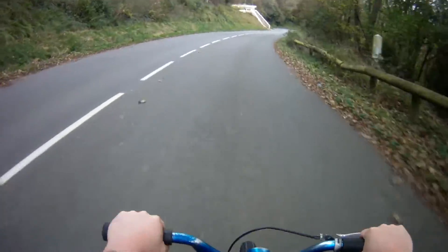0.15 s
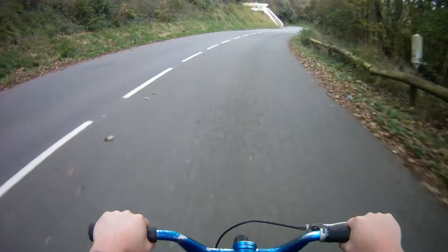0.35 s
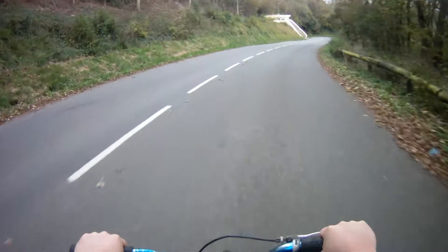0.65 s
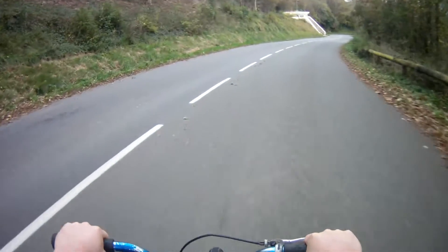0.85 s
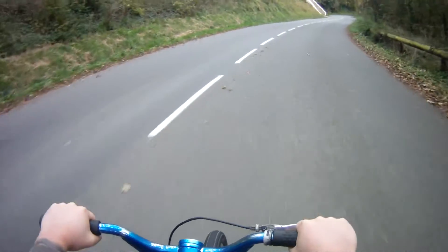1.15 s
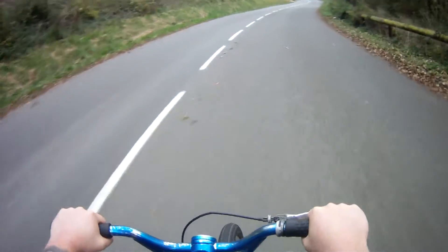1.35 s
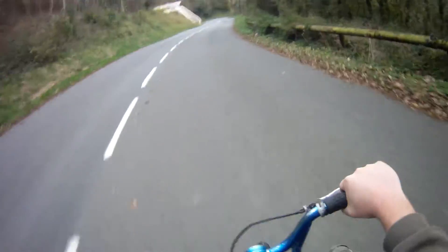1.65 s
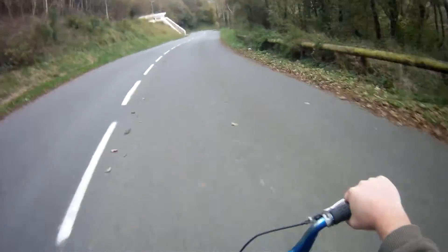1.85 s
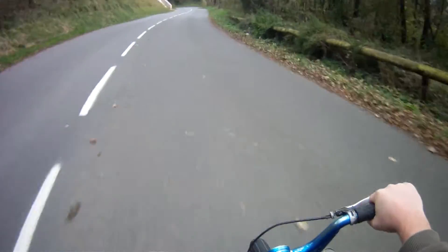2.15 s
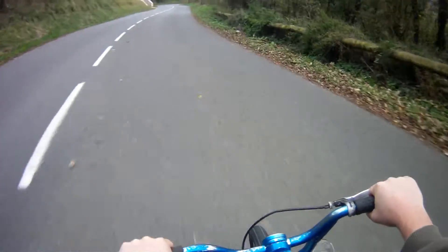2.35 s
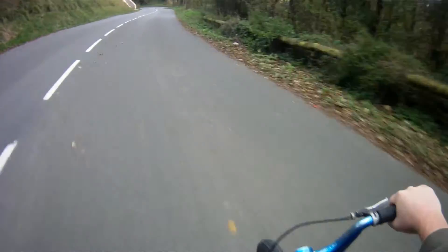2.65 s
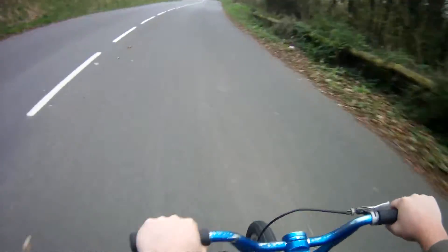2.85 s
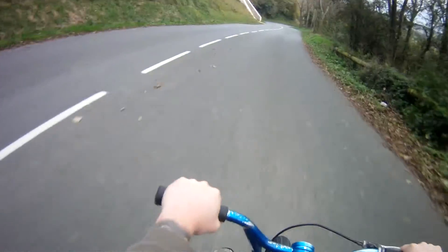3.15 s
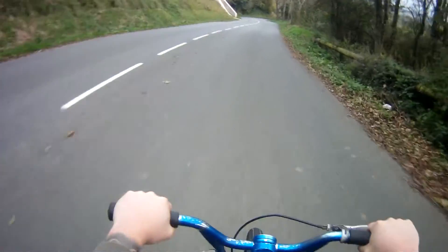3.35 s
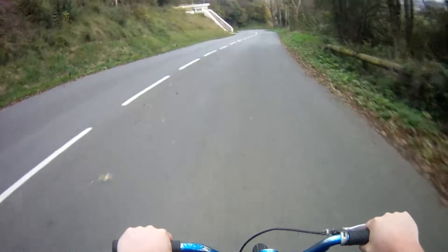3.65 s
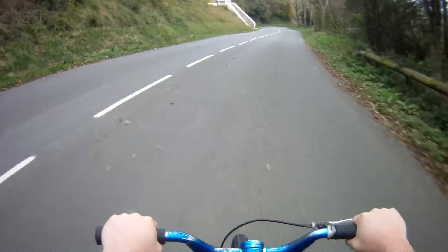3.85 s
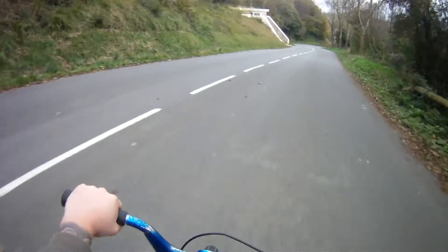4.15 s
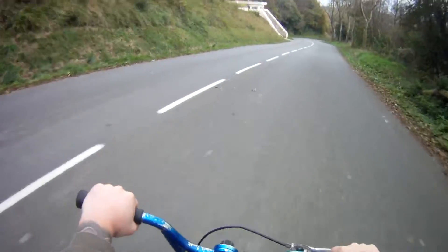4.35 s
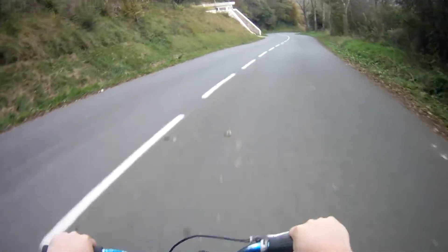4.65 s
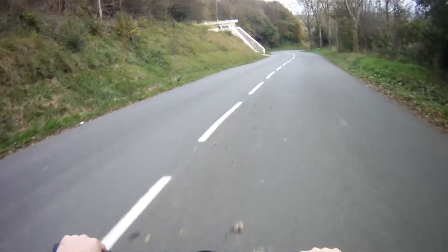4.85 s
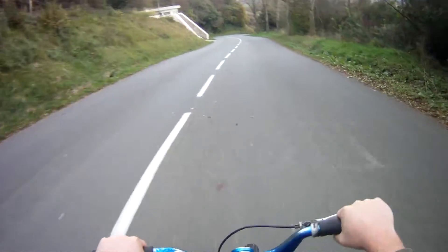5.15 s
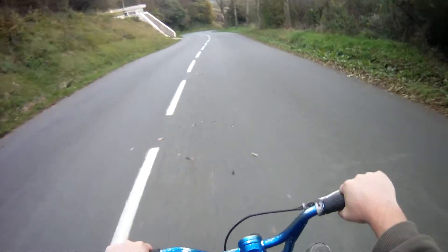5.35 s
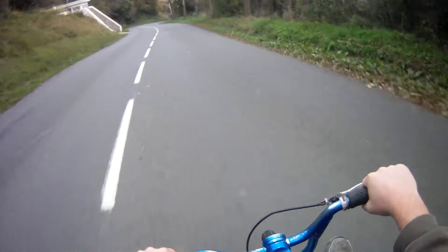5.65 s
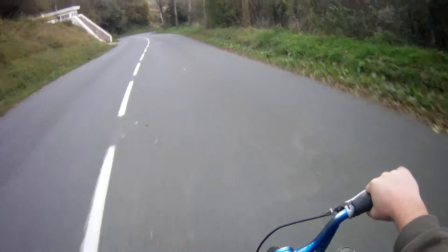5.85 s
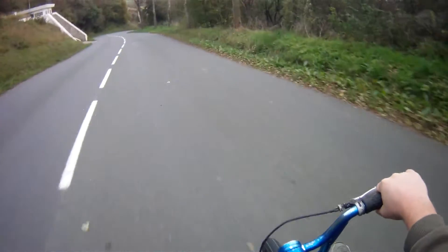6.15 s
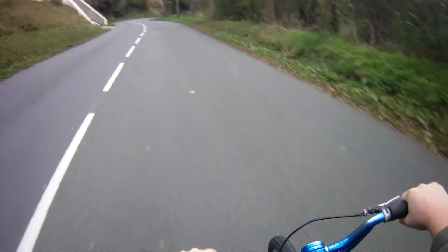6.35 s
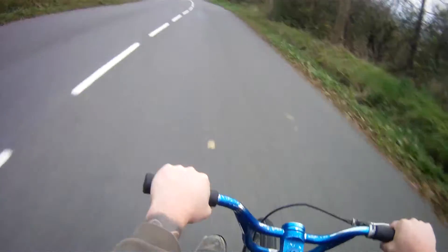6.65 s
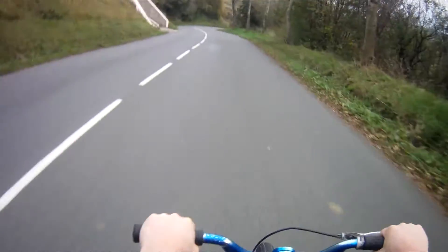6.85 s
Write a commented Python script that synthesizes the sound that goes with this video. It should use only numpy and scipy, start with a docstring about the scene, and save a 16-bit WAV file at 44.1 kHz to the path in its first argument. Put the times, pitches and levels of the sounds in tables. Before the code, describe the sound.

Hard plastic wheels of a drift trike roll fast over asphalt throughout: a dense, grainy, uneven roar with coarse stone ticks, coloured boxy and nasal by the camera's plastic case. Underneath are a soft low drone, faint lumpy wind rumble and steady hiss. At 0-0.7 s come thin squeaks and arching whistles near 3 kHz, with a knock and tiny metallic clinks. Around 1 s there are knocks and a hollow seat clonk. From 1.4 to 2.8 s the wheels scrape sideways in rough chatter, with hard knocks near 2.3 and 2.6 s and squeals towards 2.9. From 3 to 3.4 s knocks and clacks crowd together; another rattling burst with clonks fills 4-4.6 s. High clinks lead into gliding squeals at 4.8-5.6 s over renewed skidding, lasting until about 6.4 s. Scattered clacks and jingle follow, a clonk at 6.5 s and a sharp knock at 6.85 s, still rolling at the end.

```python
"""The hard rear wheels of a drift trike rumble over asphalt: dense random grains and coarser ticks.
Sideways slides add chattering noise and wandering wheel notes; gliding sines make squeals and whistles.
Jolts set off knocks, clacks, jingle and ringing frame notes; a seat clonks and a loose part clinks.
A body camera in a plastic case hears it all: case resonances colour the impacts and scrapes,
over a droning mount with soft bumps, a faint lumpy wind rumble and steady hiss."""
import sys
import numpy as np
from scipy import signal
from scipy.fft import rfft, irfft, next_fast_len
from scipy.io import wavfile
from scipy.ndimage import uniform_filter1d, map_coordinates

SR = 44100
rng = np.random.default_rng(int(sys.argv[2]) if len(sys.argv) > 2 else 0)


def log_audio(samples):
    """Write samples as a 16-bit WAV file to the path given in sys.argv[1]."""
    # one column per channel
    frames = np.atleast_2d(samples).T
    # limit to full scale, then quantise
    limited = np.clip(frames, -1, 1)
    pcm = np.round(limited * 32767).astype(np.int16)
    wavfile.write(sys.argv[1], SR, pcm)


N = 309141

# drive of the wheels by the road: (time [s], fine-texture roar level [dB], stone level [dB])
ROAD_LEVELS = [(0, -61, -54.5), (0.7, -60.5, -54.5), (1.65, -54, -54.5), (1.85, -56.5, -48),
               (2.35, -57, -50), (2.9, -57, -54.5), (3.2, -58.5, -50.5), (3.58, -58.5, -49.5),
               (3.95, -56, -61), (4.15, -55, -52.5), (4.45, -58, -50.5), (5.15, -54.5, -52.5),
               (5.8, -60, -49.5), (6.25, -55, -51.5), (6.45, -57, -54.5), (7.01, -57.5, -54)]
# treble colour of shaken small metal parts: (frequency [Hz], relative level [dB])
JINGLE_TINT = [(3000, -37), (6000, -5.5), (8400, -0.5), (9500, 4.5), (10400, 10), (11500, 7), (12600, -5),
               (15000, -9)]


def amp(db):
    """Decibels to gain."""
    return 10 ** (np.asarray(db) / 20)


def unit(x):
    """Scale x to rms 1."""
    return x / np.sqrt(np.mean(x ** 2) + 1e-20)


def curves(rows):
    """Interpolate each column after the time to one value per sample."""
    times, *columns = np.transpose(rows)
    return [np.interp(np.arange(N) / SR, times, column) for column in columns]


def wobble(rate):
    """A smooth random curve of rms 1 with `rate` knots a second."""
    knots = rng.standard_normal(int(N * rate / SR) + 4)
    return unit(map_coordinates(knots, [np.arange(N) * rate / SR]))


def gate(start, length, attack, release):
    """An envelope that rises around the start, holds and dies away."""
    t = np.arange(N) / SR - start
    rise = np.clip(t / attack + .5, 0, 1)
    return rise * np.exp(-np.maximum(t - length, 0) / release)


def swell(t, attack, decay):
    """A rounded rise to the peak at t = 0, then a slower exponential fall."""
    return np.exp(np.where(t < 0, -(t / attack) ** 2, -np.abs(t) / decay))


def grains(rate, spread_db):
    """Tiny impacts at random moments, of uneven size and random sign, rms 1."""
    struck = rng.random(N) < rate / SR
    size = amp(spread_db * np.clip(rng.standard_normal(N), -2, 2))
    return unit(struck * size * np.sign(rng.standard_normal(N)))


def grid(size=8192):
    """The frequencies on which responses are drawn, shifted by 1 Hz to avoid zero."""
    return np.fft.rfftfreq(size, 1 / SR) + 1


def colour(points):
    """Gain through (Hz, dB) points on a log frequency axis."""
    hz, db = np.transpose(points)
    return amp(np.interp(np.log(grid()), np.log(hz), db))


def resonances(modes):
    """Gain of steep-sided resonances whose powers add."""
    f = grid()
    power = 0
    for hz, width, db in modes:
        detuning = (f * f - hz * hz) / (f * width)
        power = power + amp(db) ** 2 / (1 + detuning ** 2) ** 2
    return np.sqrt(power)


def ring(x, gain):
    """Filter x causally (minimum phase) by that gain shape, keeping the power of white noise."""
    cepstrum = irfft(np.log(np.maximum(gain / gain.max(), 1e-6)))
    half = len(cepstrum) // 2
    cepstrum[1:half] *= 2  # fold the cepstrum onto positive time
    cepstrum[half + 1:] = 0
    response = irfft(np.exp(rfft(cepstrum)))[:half]
    return signal.fftconvolve(x, response / np.linalg.norm(response))[:N]


def through_case(force, points):
    """A force of the given colour rings the plastic camera case."""
    # resonances of the case and its mount: (frequency [Hz], width [Hz], relative level [dB])
    case_modes = [(646, 350, -18.5), (953, 258, -10), (1110, 113, -7), (1231, 156, -4.5), (1463, 164, -4),
                  (1634, 60, -9), (2102, 283, 0.5), (2257, 178, -0.94), (2880, 310, -8), (3370, 510, -7),
                  (3733, 270, -8.5), (3800, 270, -22.5), (4440, 680, -9.5), (4963, 155, -7.5),
                  (5304, 370, -12.5), (5910, 310, -18.5), (6234, 226, -13), (6680, 530, -21.5),
                  (6850, 220, -15), (7250, 920, -19), (8455, 280, -18.5), (9530, 500, -16),
                  (10600, 110, -21.5), (11000, 1500, -28.5), (12500, 1439, -27), (14700, 2300, -23.5)]
    return ring(force, colour(points) * resonances(case_modes))


def patchy(x, depth_db):
    """Make the colour of x wander in patches a few hundred hertz wide."""
    spectrum = signal.stft(x, nperseg=512)[2]
    field = rng.standard_normal(spectrum.shape)
    for _ in range(2):
        field = uniform_filter1d(field, size=3, axis=0)  # across frequency
        field = uniform_filter1d(field, size=16, axis=1)  # across time
    return signal.istft(spectrum * amp(depth_db * unit(field)), nperseg=512)[1][:N]


def rolling():
    """Fine asphalt texture makes a dense, shifting roar; coarser stones tick in clumps on the wheels."""
    # colours of the two forces: (frequency [Hz], relative level [dB])
    roar_tint = [(400, -1), (1000, -1), (1500, 0), (2150, -2), (2900, 4.5), (3600, -1.5), (5200, -3.5),
                 (6500, -11), (9500, -23.5), (15000, -10.5)]
    stone_tint = [(500, -8), (1300, -4), (2150, -2), (2900, -6), (5000, -6), (9500, -13.5), (15000, -21.5)]
    roar_db, stones_db = curves(ROAD_LEVELS)
    texture_db = 0.55 * wobble(14) + 1.0 * wobble(70)
    roar_force = grains(rate=7000, spread_db=3.5) * amp(roar_db + texture_db + 3.5)
    roar = through_case(roar_force, roar_tint)
    clumps_db = 2.12 * wobble(150)
    stone_force = grains(rate=650, spread_db=1.5) * amp(stones_db + clumps_db - 1.1)
    stones = through_case(stone_force, stone_tint)
    return patchy(roar, depth_db=1.5) + stones


def sliding():
    """Plastic scrapes sideways in a fast uneven chatter that stirs notes of the wheels."""
    # sideways slides of the rear wheels: (start [s], hold [s], drive level [dB])
    slide_rows = [(0.0, 0.13, -68), (1.288, 0.044, -59.5), (1.43, 0.56, -61.5), (2.053, 0.72, -59.5),
                  (2.896, 0.11, -61.5), (3.215, 0.1, -66), (3.531, 0.16, -61.5), (4.024, 0.24, -63.5),
                  (4.504, 0.037, -59), (5.064, 0.53, -59.5), (5.677, 0.68, -59), (6.438, 0.11, -55),
                  (6.662, 0.046, -59)]
    # scrape colour: (frequency [Hz], relative level [dB])
    scrape_tint = [(500, -13), (1200, -10), (2150, -7), (3300, -9.5), (4400, -2.5), (6500, -0.5),
                   (9500, -2.5), (10400, 0), (11200, 3.5), (12600, 1), (14000, -10), (15300, -9)]
    # wheel notes: (frequency [Hz], nominal width [Hz], relative level [dB])
    wheel_notes = [(1530, 55, -13.5), (3350, 70, 1), (4500, 110, -7.5), (4860, 80, 3), (6040, 110, -14.5),
                   (6250, 80, -5), (6600, 38, -9.5), (7290, 90, -3.5), (9740, 88, -5), (10330, 150, -1),
                   (12500, 330, -15)]
    attack_s, release_s = 0.038, 0.083  # the wheels break loose, and grip again
    creep_db = -13  # slight scrape of gripping wheels, relative to the roar drive
    t = np.arange(N) / SR
    roar_db, _ = curves(ROAD_LEVELS)
    slides = [amp(db) * gate(start, hold, attack_s, release_s) for start, hold, db in slide_rows]
    level = np.max(slides + [amp(roar_db + creep_db)], axis=0)
    chatter_db = 1.58 * wobble(35) + 2.15 * wobble(150)
    force = level * amp(chatter_db)
    scrape = through_case(force * grains(rate=5000, spread_db=2.5) * amp(4.5), scrape_tint)
    sing = np.zeros(N)
    for hz, width, db in wheel_notes:
        # a random complex envelope spreads each note into a narrow band
        envelope = wobble(1.3 * width) + 1j * wobble(1.2 * width)
        note = np.real(envelope * np.exp(2j * np.pi * hz * t))
        sing += note * amp(db + 3.8 * wobble(10) - 10.0)
    return patchy(scrape, depth_db=1.85) + force * sing


def mount():
    """The road keeps the camera mount droning softly; bumps push it into brief damped swings."""
    # mount resonances: (frequency [Hz], width [Hz], relative level [dB])
    mount_modes = [(122, 20.6, -8), (168, 29, -3.5), (205.6, 36, 1), (265.4, 60, -1.5), (449, 163, -6)]
    # soft bumps: (start [s], drive level [dB], pitch [Hz], decay [s])
    bump_rows = [(0.159, -49.5, 205, 0.0075), (0.183, -57, 150, 0.008), (1.987, -50, 205, 0.0047),
                 (2.811, -56, 150, 0.0046), (2.823, -47, 218, 0.0057), (2.863, -56, 190, 0.008),
                 (4.449, -54, 205, 0.0065), (5.031, -57, 150, 0.012), (5.131, -61, 208, 0.015),
                 (5.534, -58, 195, 0.018), (6.307, -51.5, 205, 0.0048)]
    roar_db, _ = curves(ROAD_LEVELS)
    drone_db = -71.5 + 0.47 * (roar_db - roar_db.mean()) + 1.14 * wobble(20)
    drone = rng.standard_normal(N) * amp(drone_db)
    t, bumps = np.arange(SR // 8) / SR, np.zeros(N)
    for start, db, hz, decay in bump_rows:
        swing = np.sin(2 * np.pi * hz * t) * np.exp(-t / decay) * (1 - np.exp(-t / 0.0016))
        push = t / .003 * np.exp(-t / .003)
        bumps[int(start * SR):][:len(t)] += amp(db + 3.0) * (swing - .4 * push)
    return ring(drone, resonances(mount_modes)) + bumps


def wind():
    """The airstream is filtered noise: a faint, lumpy rumble inside the shut case."""
    # rumble colour: (frequency [Hz], relative density [dB per Hz])
    rumble_tint = [(8, -11), (24, 6.5), (35, 1), (50, -10.5), (75, -18.5), (150, -29), (500, -36),
                   (2000, -87)]
    wind_db, gust_db = -74.5, 2  # middle level and rms of its slow swing
    rumble = ring(rng.standard_normal(N), colour(rumble_tint))
    return rumble * amp(wind_db + gust_db * wobble(3) + 2.0 * wobble(12))


def hiss():
    """A steady bed of coloured noise."""
    # hiss colour: (frequency [Hz], relative density [dB per Hz])
    hiss_tint = [(30, 0), (600, -1), (3000, -6.5), (8000, -12), (15000, -18.5)]
    return ring(rng.standard_normal(N), colour(hiss_tint)) * amp(-68.0)


def fine_hiss():
    """Independent treble noise for each of the two channels."""
    # treble colour: (frequency [Hz], relative level [dB])
    treble_tint = [(3000, -39), (6000, -19), (9000, -1), (12000, -3), (14000, -0.5)]
    channels = [ring(rng.standard_normal(N), colour(treble_tint)) for _ in range(2)]
    return amp(-78.5) * np.array(channels)


def light_jolts():
    """Small road flaws shake the frame at random, harder when the roar is louder; rows as in rattles."""
    # drive relative to the roar drive: (knock [dB], clack [dB], jingle [dB])
    jolt_offsets = [5.6, -6, -9.5]
    jolts_per_s, length_s, spread_db = 10, 0.0052, 2.5
    note_hz, note_scatter = 4980, 0.026  # typical frame note and its relative scatter
    roar_db, _ = curves(ROAD_LEVELS)
    moments = np.flatnonzero(rng.random(N) < jolts_per_s / SR)
    scatter_db = spread_db * np.clip(rng.standard_normal((N, 3)), -1.5, 1.5)
    hz = note_hz * (1 + note_scatter * rng.standard_normal(N))
    rows = []
    for i in moments:
        levels = roar_db[i] + scatter_db[i] + np.asarray(jolt_offsets)
        rows.append((i / SR, length_s, *levels, hz[i]))
    return rows


def rattles():
    """Each jolt knocks the case and shakes loose parts into a short flurry of clacks and jingle."""
    # strong jolts: (time [s], nominal length [s], knock drive [dB], clack drive [dB],
    # jingle drive [dB], loudest frame note [Hz])
    strong_jolts = [(0.025, 0.0068, -45, -62, -64, 4970), (0.187, 0.011, -44.5, -52, -60, 4930),
                    (0.997, 0.015, -52, -54.5, -59, 4550), (1.053, 0.004, -44, -60, -71, 4940),
                    (1.371, 0.0048, -50, -53, -70, 4940), (1.445, 0.026, -49, -52, -64, 5170),
                    (1.491, 0.04, -71, -63, -57, 4940), (2.251, 0.004, -39, -48.5, -65, 4420),
                    (2.338, 0.007, -42, -57, -56, 4940), (2.383, 0.011, -40, -58, -56, 4940),
                    (2.592, 0.006, -39, -53, -56, 4940), (2.638, 0.009, -40, -51.5, -63, 4940),
                    (2.957, 0.006, -52, -48, -62, 4940), (2.996, 0.011, -60, -50, -60, 4950),
                    (3.098, 0.008, -43, -49, -62, 4940), (3.132, 0.0069, -39, -53, -68, 5000),
                    (3.151, 0.008, -40, -57, -70, 5000), (3.183, 0.004, -44, -57, -68, 4930),
                    (3.220, 0.01, -43, -51, -64, 4880), (3.244, 0.011, -38, -43, -63, 4950),
                    (3.303, 0.0064, -38.5, -56, -66, 4880), (3.311, 0.007, -44, -57, -68, 4880),
                    (3.34, 0.0069, -37.5, -58, -71, 4930), (3.597, 0.033, -51, -63, -60, 4930),
                    (3.719, 0.011, -46, -50.5, -58, 5000), (3.757, 0.003, -43.5, -69, -78, 4930),
                    (3.884, 0.0097, -57, -51.5, -73, 5400), (4.043, 0.01, -46, -57, -66, 4800),
                    (4.067, 0.01, -44, -50, -62, 4960), (4.102, 0.017, -45, -50.5, -67, 6240),
                    (4.137, 0.01, -58, -66, -56.5, 4940), (4.180, 0.008, -37, -49.5, -60, 4900),
                    (4.207, 0.008, -47, -50, -61, 4870), (4.232, 0.014, -41.5, -50.5, -55, 4500),
                    (4.301, 0.003, -45, -64, -77, 4510), (4.461, 0.004, -39.5, -59, -76, 4330),
                    (4.504, 0.0084, -38, -55, -59, 6880), (4.526, 0.014, -39.5, -45, -55, 5030),
                    (4.885, 0.005, -57, -55, -75, 4580), (5.138, 0.021, -43, -54.5, -57, 5220),
                    (5.233, 0.0091, -44, -63, -57, 4940), (5.771, 0.0034, -40.5, -54, -68, 4940),
                    (6.060, 0.02, -42, -50, -59, 4920), (6.168, 0.013, -49, -45, -52, 4970),
                    (6.207, 0.009, -57, -51, -52, 4500), (6.496, 0.016, -46, -45, -58, 4940),
                    (6.54, 0.017, -62, -68, -56, 4970), (6.591, 0.0099, -49, -52, -65, 4940),
                    (6.728, 0.012, -40, -55, -69, 4970), (6.853, 0.0065, -35.5, -61, -79, 4900)]
    # force colours: (frequency [Hz], relative level [dB])
    knock_tint = [(400, -2), (950, 5.5), (1400, -23), (2150, 4.5), (3000, -4), (4500, -39), (9000, -41)]
    clack_tint = [(900, 0), (2100, -33), (2800, -7), (4400, 2), (5300, 8.5), (7300, 7), (9500, -16),
                  (15000, -13)]
    # the frame's ring under a clack: (frequency [Hz], width [Hz], relative level [dB])
    frame_modes = [(2763, 75, 4.5), (3337, 71, 5), (4850, 200, -4), (5450, 170, -6), (5950, 140, -7),
                   (6320, 220, -18.5), (6650, 90, -9), (7190, 350, -6)]
    knock_hz, knock_s = 2160, 0.0022  # a strong case note, and the half-width of its burst
    t, shake, notes = np.arange(N) / SR, np.zeros((3, N)), np.zeros(N)
    waver = np.cumsum(55 * wobble(500)) / SR  # random phase drift of the notes, in cycles
    for s, length, knock_db, clack_db, jingle_db, hz in [*strong_jolts, *light_jolts()]:
        near = slice(max(0, int((s - .05) * SR)), int((s + .1) * SR))
        age = t[near] - s
        # the flurry peaks slightly before the listed time
        flurry = swell(age + 0.11 * length, attack=0.0013, decay=0.84 * max(length, .003))
        shake[:, near] += amp([knock_db, clack_db, jingle_db])[:, None] * flurry
        frame_note = np.sin(2 * np.pi * (hz * age + waver[near]))
        notes[near] += amp(clack_db + 4.0) * flurry * frame_note
        burst = np.exp(-(age / knock_s) ** 2)
        knock_note = np.sin(2 * np.pi * (knock_hz * age + waver[near]))
        notes[near] += amp(knock_db + 1.0) * burst * knock_note
    knock = through_case(shake[0] * grains(rate=5600, spread_db=1.0) * amp(-11), knock_tint)
    clack = through_case(shake[1] * grains(rate=4700, spread_db=0.5) * amp(0.4), clack_tint)
    frame = ring(shake[1] * grains(rate=4600, spread_db=5.0) * amp(1.0), resonances(frame_modes))
    jingle = through_case(shake[2] * grains(rate=6900, spread_db=3.5) * amp(2.5), JINGLE_TINT)
    return knock + clack + frame + notes + patchy(jingle, depth_db=3.0)


def squeals():
    """A wheel sticks and slips at one of its notes: a thin, gliding whistle with a rasping edge."""
    # squeals: (start [s], hold [s], drive level [dB], starting pitch [Hz], glide [Hz per s],
    # rasp relative to the drive [dB])
    squeal_rows = [(0.06, 0.06, -62, 2890, 0, -8), (0.128, 0.041, -54, 2915, 0, -9),
                   (0.172, 0.055, -52, 2960, -700, -6), (0.291, 0.072, -62, 2900, 0, -1),
                   (0.477, 0.11, -61, 2880, 0, -8), (2.505, 0.03, -54, 2850, -2, -5),
                   (2.754, 0.011, -49, 2930, -600, -9), (2.793, 0.045, -57, 2930, -900, -7),
                   (2.854, 0.098, -50, 2905, -150, -18), (4.79, 0.1, -51.5, 3000, -700, -11),
                   (4.926, 0.1, -54, 3030, -1500, -1), (5.11, 0.038, -50, 2850, 2, -8),
                   (5.205, 0.13, -52, 2940, 150, -11), (5.363, 0.085, -56, 2920, 0, -3),
                   (5.488, 0.07, -53.5, 2920, 0, -6), (5.566, 0.03, -52, 2960, -2800, -10),
                   (6.279, 0.027, -48, 2900, 0, -16)]
    # wheel notes stirred by a squeal: (frequency [Hz], width [Hz], relative level [dB])
    rasp_modes = [(1498, 72, 2.5), (3010, 280, 4.5), (3390, 510, 2)]
    attack_s, release_s = 0.011, 0.018
    t, whistle, strength = np.arange(N) / SR, np.zeros(N), np.zeros(N)
    waver_hz = 14 * wobble(25) + 36 * wobble(300)
    for start, hold, db, hz, glide, rasp_db in squeal_rows:
        near = slice(max(0, int((start - .05) * SR)), int((start + .4) * SR))
        level = amp(db) * gate(start, hold, attack_s, release_s)[near]
        pitch = hz + glide * (t[near] - start) + waver_hz[near]
        whistle[near] += level * np.sin(2 * np.pi * np.cumsum(pitch) / SR)
        strength[near] += level * amp(rasp_db)
    rasp = ring(strength * grains(rate=3700, spread_db=0.5), resonances(rasp_modes))
    return whistle * amp(2.4 * wobble(120) + 0.5) + rasp


def clinks():
    """A loose metal part buzzes briefly on one wavering high note, with a little jingle around it."""
    # clinks: (peak time [s], drive level [dB])
    clink_rows = [(0.087, -52), (0.255, -52), (0.925, -51.5), (1.024, -52), (1.070, -53), (2.033, -54),
                  (3.159, -51), (3.330, -58), (4.556, -50), (4.611, -50), (4.666, -51), (4.741, -49),
                  (4.773, -55), (4.812, -53), (5.053, -57), (5.317, -59), (6.881, -58)]
    note_hz, attack_s, decay_s = 9400, 0.0032, 0.007
    t = np.arange(N) / SR
    level = sum(amp(db) * swell(t - peak, attack_s, decay_s) for peak, db in clink_rows)
    note = np.sin(2 * np.pi * np.cumsum(note_hz + 90 * wobble(500)) / SR)
    jingle_force = level * grains(rate=6000, spread_db=4.0) * amp(-4.5)
    return level * note * amp(-4.5) + through_case(jingle_force, JINGLE_TINT)


def whistles():
    """As a wheel skims the road, a thin whistle arches up in pitch and falls again."""
    # whistles: (middle [s], length [s], peak level [dB], top pitch before waver [Hz])
    whistle_rows = [(0.14, 0.083, -58, 3230), (0.215, 0.13, -62, 3330), (0.58, 0.12, -56, 3190),
                    (0.673, 0.09, -58, 3060), (5.548, 0.055, -51, 3390)]
    arch_hz = 285  # how far the pitch lies below its top at both ends
    t, sound = np.arange(N) / SR, np.zeros(N)
    waver_hz = 45 * wobble(300)
    for middle, length, db, hz in whistle_rows:
        position = 2 * (t - middle) / length  # -1 at the start, 1 at the end
        near = np.abs(position) < 1
        u = position[near]
        pitch = hz - arch_hz * u ** 2 + waver_hz[near]
        sound[near] += amp(db) * np.sqrt(1 - u ** 2) * np.sin(2 * np.pi * np.cumsum(pitch) / SR)
    return sound


def clonks():
    """The plastic seat answers heavier jolts with a short hollow sound: decaying grains that ring it."""
    # clonks: (start [s], drive level [dB])
    clonk_rows = [(0.923, -50), (1.023, -48), (4.043, -47), (4.101, -46.5), (4.206, -45.5), (4.236, -45),
                  (4.552, -44.5), (4.577, -46), (6.506, -45), (6.539, -54)]
    # seat resonances: (frequency [Hz], width [Hz], relative level [dB])
    seat_modes = [(468, 290, -7.5), (624, 120, -17), (986, 170, 5)]
    t, shake = np.arange(SR // 10) / SR, np.zeros(N)
    for start, db in clonk_rows:
        shake[int(start * SR):][:len(t)] += amp(db - 5.0) * np.exp(-t / 0.011)
    return ring(shake * grains(rate=2500, spread_db=2.0), resonances(seat_modes))


def scene():
    """All sources reach both channels alike; only a faint treble noise differs between the two channels."""
    road = rolling() + sliding() + squeals() + whistles()
    loose_parts = rattles() + clinks() + clonks()
    beds = mount() + wind() + hiss()
    return road + loose_parts + beds + fine_hiss()


def record(dry):
    """The camera keeps nothing above its band limit."""
    top_hz = 15350
    size = next_fast_len(N + SR // 2)
    passband = np.fft.rfftfreq(size, 1 / SR) < top_hz
    return irfft(rfft(dry, size) * passband, size)[:, :N]


dry = scene()
out = record(dry)
log_audio(out)
```